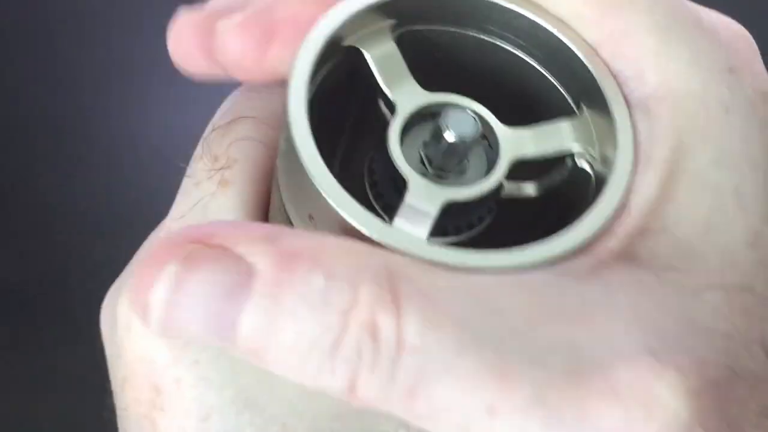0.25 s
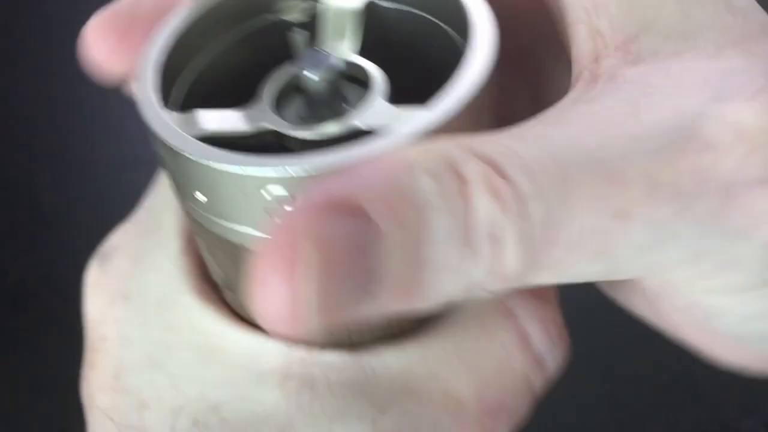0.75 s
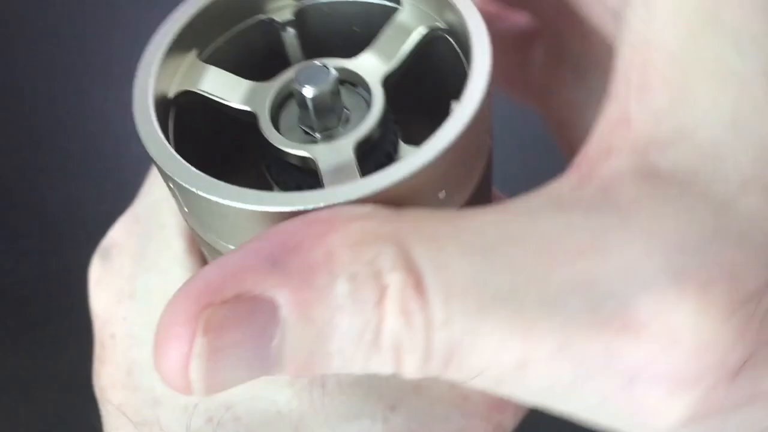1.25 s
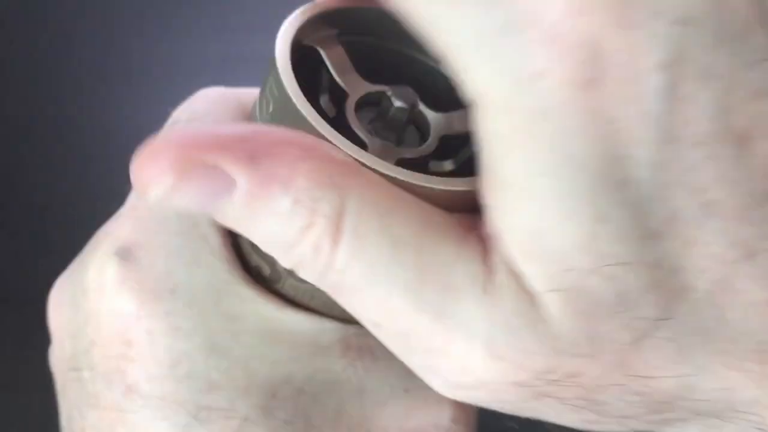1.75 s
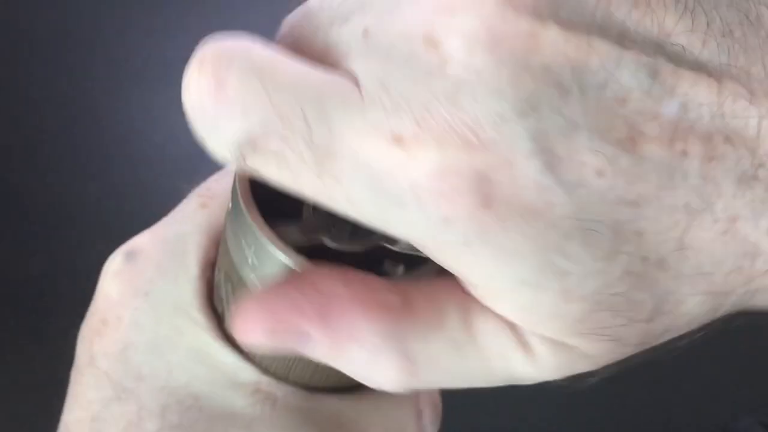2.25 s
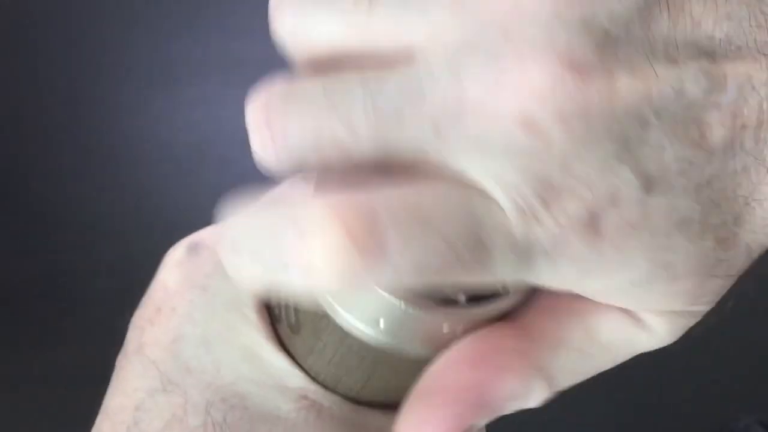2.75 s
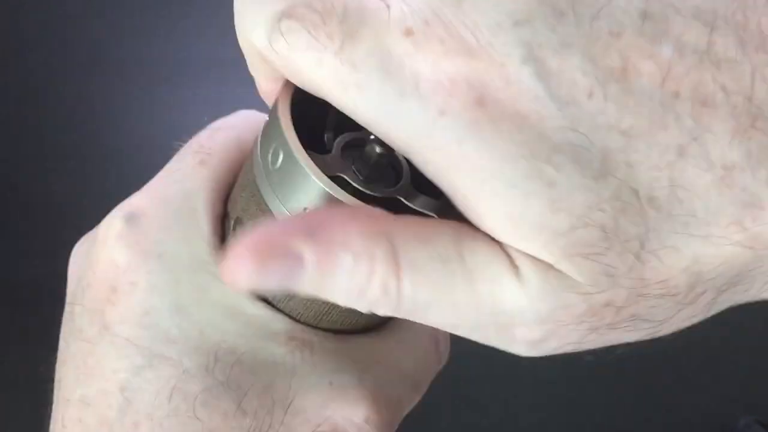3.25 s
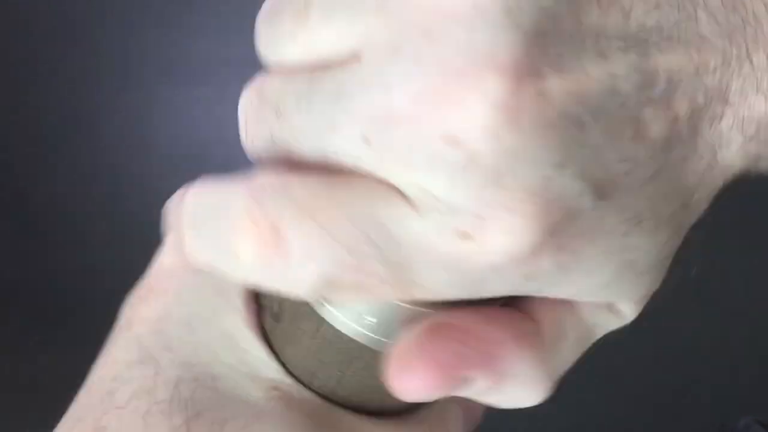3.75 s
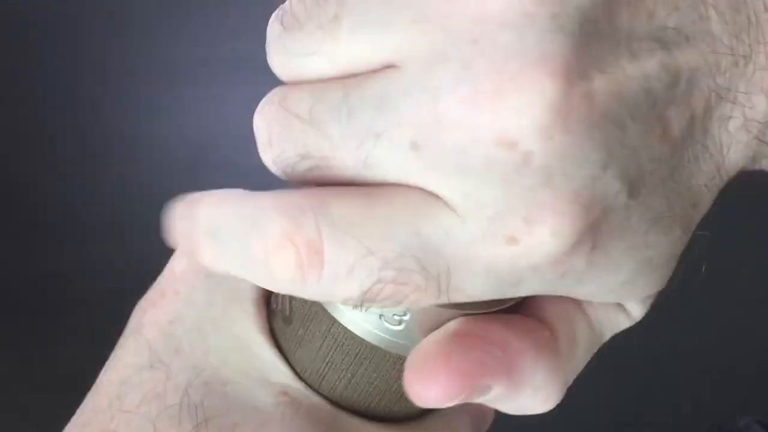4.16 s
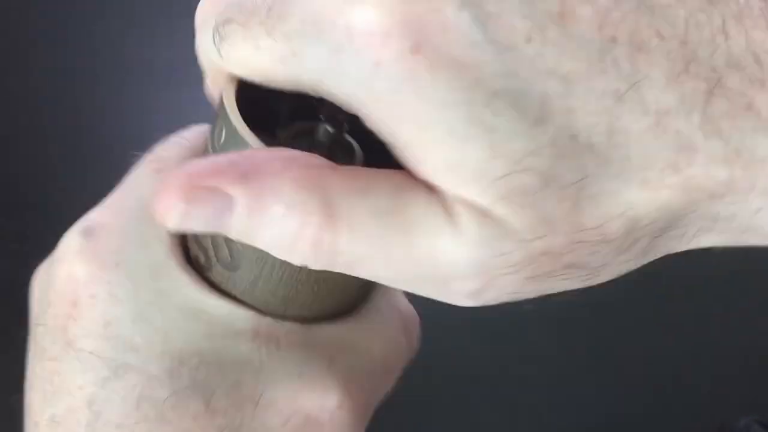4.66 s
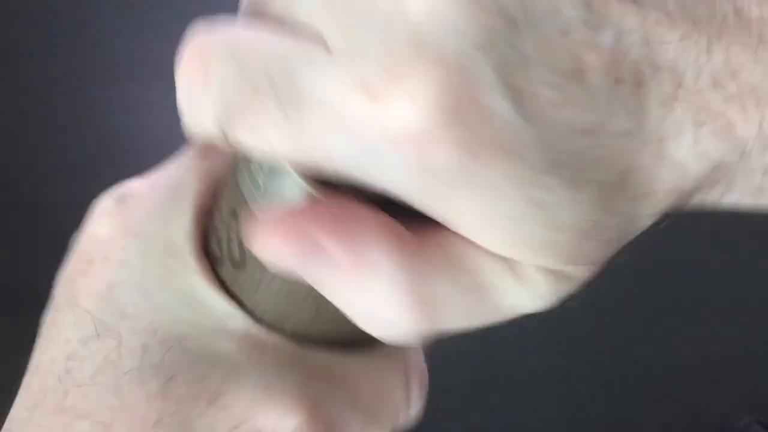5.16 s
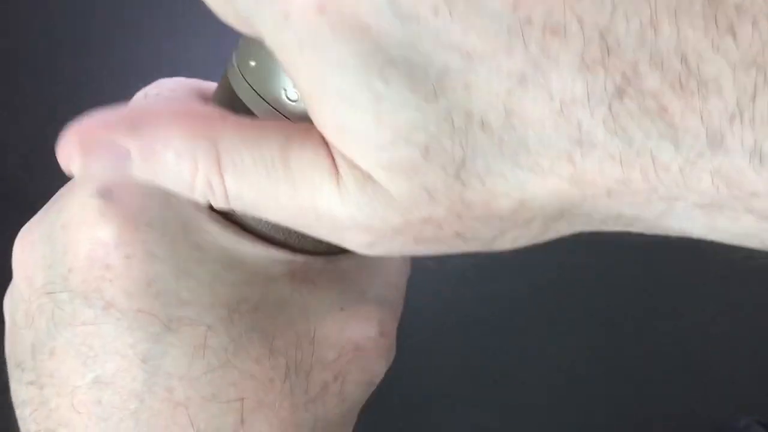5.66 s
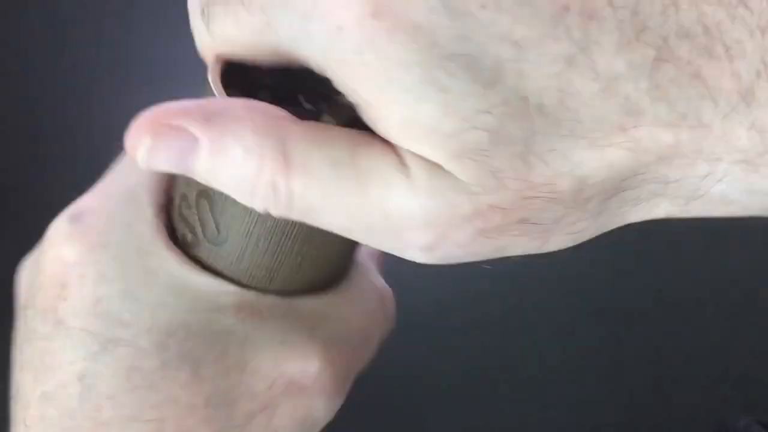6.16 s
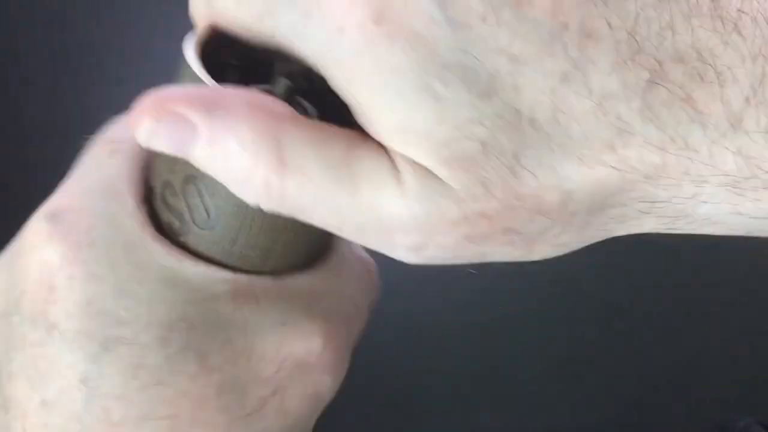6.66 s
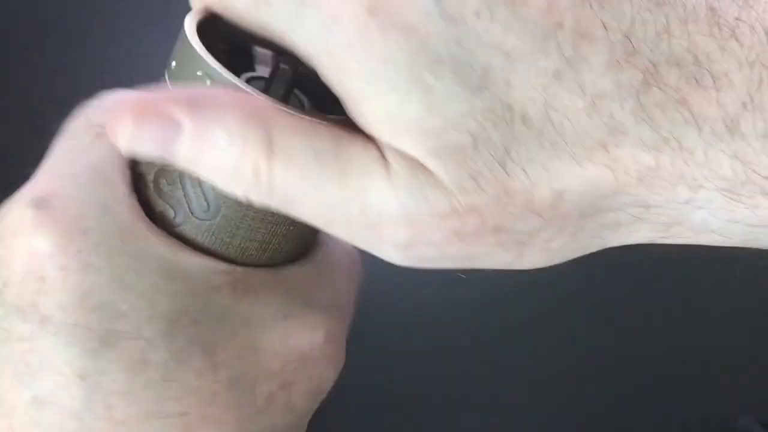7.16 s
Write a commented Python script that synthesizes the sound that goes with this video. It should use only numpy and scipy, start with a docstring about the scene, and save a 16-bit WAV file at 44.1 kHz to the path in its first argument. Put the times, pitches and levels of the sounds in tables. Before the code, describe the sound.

A few separate clicks start a fast metallic ratcheting, then sixteen short zips follow roughly three a second. The clicks are dry, hard and steely, with a small hollow cup resonance and light body thump; the first few twists are loudest and more open, later ones duller as the hand covers the cup. Light finger taps fall between. Close microphone, small room with a short diffuse tail, quiet low rumble and slight hiss.

```python
"""In a small room with a low rumble, the dial of a metal hand coffee grinder is turned close by in sixteen quick twists.
In each twist a sprung pin drops into one detent after another. Every drop is an impulse: shaped noise bursts crack,
the steel rings as decaying modes, and damped sines give the body's thump and the note of the air in the cup.
That note rises through each twist and is mostly lower in the later ones. Fingers rub and tap between twists;
the room answers with a diffuse tail over rumble and faint hiss."""
import sys
import numpy as np
from scipy import signal
from scipy.fft import rfft, irfft, next_fast_len
from scipy.io import wavfile
from scipy.ndimage import uniform_filter1d, map_coordinates

SR = 44100
rng = np.random.default_rng(int(sys.argv[2]) if len(sys.argv) > 2 else 0)


def bounce(signal):
    """Save signal as a 16-bit WAV file at the path given by the first command-line argument."""
    frames = np.transpose(np.atleast_2d(signal))
    limited = np.clip(frames, -1, 1)
    pcm = np.round(limited * 32767).astype(np.int16)
    wavfile.write(sys.argv[1], SR, pcm)


N = 326264  # length [samples]

# Level of the rumble over time, before DEEP_DB and LOW_DB: (time [s], deep level [dB], low level [dB])
RUMBLE_LEVELS = [(0.0, -68, -69.5), (0.59, -60, -64.5), (1.01, -66.5, -69), (1.42, -66.5, -68),
                 (4.95, -56, -58.5), (6.26, -72, -69), (7.4, -69.5, -64.5)]
# Spectrum of the deep rumble: (frequency [Hz], gain [dB])
DEEP_SPECTRUM = [(20, -42), (35, -17.5), (48, -4), (58, 5), (80, -6.5), (102, 0.5), (135, -13),
                 (200, -46.5)]
# Spectrum of the low rumble: (frequency [Hz], gain [dB])
LOW_SPECTRUM = [(70, -24), (125, 3), (200, -2), (260, -11.5), (340, -3.5), (430, -19.5), (700, -52)]
# Spectrum of the hiss: (frequency [Hz], gain [dB])
HISS_SPECTRUM = [(200, -14.5), (450, -7.5), (1000, -10.5), (2000, -12), (4000, -17), (9000, -24),
                 (16000, -31.5)]
# Reverberation time of the room: (frequency [Hz], T60 [s])
ROOM_DECAY = [(200, .35), (800, 0.62), (2000, 0.64), (6000, 0.59), (10000, 0.53), (15000, 0.38)]
# Skin sliding on the dial: (middle [s], half length [s], level [dB])
RUBS = [(0.284, .018, -64), (0.344, 0.017, -68)]
# Fingers letting go of the dial or taking hold:
# (time [s], level [dB], cup note [Hz], balance of the tick [dB])
TAPS = [(0.788, -50, 963, -14), (1.248, -54, 1053, -11), (3.58, -38.5, 1070, -12), (4.677, -27, 1031, 4),
        (5.403, -35, 971, 3.5)]
# Colour of the struck or rubbed metal: (frequency [Hz], gain [dB])
METAL_COLOUR = [(300, -15), (550, -20), (900, -10.5), (1400, -5), (2000, -1), (4100, 0), (4800, -5.5),
                (5400, 2), (6700, 7.5), (7600, 3), (8700, 7), (10400, 0), (12200, 7.5), (15700, 1)]
# Clusters of long-ringing modes in the steel: (centre [Hz], width [Hz], gain [dB])
STEEL_MODES = [(2140, 160, 10), (5320, 240, 7), (6600, 640, -15)]
# Broad resonances of the metal that the grip damps or frees:
# (centre [Hz], width [Hz], change over a twist [dB], gain in a firm grip [dB], gain in a loose grip [dB])
GRIP_RESONANCES = [(3150, 2100, -5, -1.73, -0.43), (5290, 600, -1.5, -6.5, 9), (6810, 650, -1.5, -4.5, 5.5),
                   (9190, 1000, -6, -1, -1), (12000, 760, 0, 0.5, -1.7)]
# One row per twist of the wrist, before scatter: (first drop [s], last drop [s], drops [count],
#   lag [+ starts slowly, - ends slowly], rush [+ fastest in the middle],
#   level at start, middle, end [dB], treble above 10 kHz at start, middle, end [dB],
#   mids [dB], looseness of grip [0-1], cup note at mid-twist [Hz], cup level [dB])
TWISTS = [(0.6165, 0.6943, 9, 0.27, 0.023, -33.5, -28, -33, 9, -14.5, -4, 1, 0.38, 1103, -14),
          (1.0919, 1.1902, 14, 0.035, -0.15, -26, -27, -32, -3, -4, -14, -3.5, 0.8, 1230, -16),
          (1.4846, 1.5637, 10, -.3, .57, -28, -23, -27, -2, -1.5, -3.5, -2, 0.93, 1218, -15.5),
          (1.9631, 2.0952, 23, 0.22, 0.46, -32, -35.5, -33, -1.5, -1.5, -5.5, -3, 0.67, 996, -17),
          (2.3474, 2.4437, 14, 0.28, 0.32, -33.5, -33, -31, 5, 7.5, -1.5, -4.5, 0.47, 1017, -19),
          (2.708, 2.8037, 12, -0.15, .41, -35, -37, -32, 0.5, 0, 4, -1.5, 0.24, 999.6, -23),
          (3.0686, 3.161, 13, -0.12, .08, -33.5, -34, -36, -2.5, 8, 4, -1, 0.66, 970, -15),
          (3.4228, 3.526, 15, -0.19, -0.11, -31, -36, -35, -3, 0.5, -3, 0.5, 0.43, 970, -15.5),
          (3.7867, 3.8889, 15, 0.015, 0.094, -38, -30.5, -33, -7.5, 4.5, 3, -6, 0, 838, -16),
          (4.151, 4.2427, 13, -.23, 0.3, -36, -32.5, -29.5, 6.5, -12.5, 3.5, -2.5, 0, 930, -21),
          (4.5094, 4.6138, 17, -.13, .27, -31.5, -33.5, -36, 0.5, 2.5, 6.5, -1, 0.35, 943, -21.5),
          (4.8682, 4.9543, 14, -.31, 0.35, -30.5, -27, -37.5, -1, -1, -3.5, -1, 0.2, 1006, -28),
          (5.2392, 5.3395, 16, 0.45, .31, -37.5, -36, -39, -7, -6, -3, -1.5, 0.36, 851, -14.5),
          (5.9621, 6.1183, 20, 0.11, -0.063, -33.5, -35, -32, -10.5, -13, -4.5, -5, 0.12, 853, -16),
          (6.4644, 6.614, 22, -0.19, 0.11, -34, -32, -27.5, 0.5, 2, 0.5, -0.5, 0.56, 923, -22),
          (6.956, 7.0882, 24, -0.27, 0.3, -37, -29.5, -38.5, 0, 3.5, 1.5, -1.5, 0.14, 965, -19.5)]
# Drops that stand out, the slow ones as the dial starts or stops and the hardest within a twist:
# (time [s], level [dB], treble above 10 kHz [dB])
LONE_DROPS = [(0.5133, -29, -8), (0.5198, -31, 2.5), (0.53, -27.5, 5.5), (0.5448, -29.5, -2.5),
              (0.5671, -34, 8), (0.596, -33.5, 14), (0.7154, -25.5, -9.5), (1.114, -25.5, 8),
              (1.2025, -26.5, -4), (1.5141, -21.5, 2.5), (1.5212, -21, 0), (1.537, -24, -3),
              (1.578, -31, 12.5), (1.5948, -30, 2.5), (2.455, -36.5, 2.5), (2.7723, -31, 6),
              (2.7899, -30.5, 6), (3.0765, -30, -2), (3.1815, -34, 7.5), (3.4339, -27, 3.5),
              (4.2318, -31, 3.5), (4.2636, -28.5, -11.5), (4.9739, -37, -2), (5.2262, -36, -6),
              (5.2927, -28.5, -4.5), (5.3426, -33.5, 3.5), (6.0051, -33.5, 2.5), (6.098, -30.5, -6),
              (6.4652, -30, -3), (6.6141, -32.5, 7)]
# How far the turning hand has closed over the cup: (time [s], closure [0-1])
HAND_CLOSURE = [(.7, 0.1), (1.9, 0.43), (3.5, 0.75)]

DEEP_DB, LOW_DB = 4.5, -1  # added to the rumble levels
BAND_LIMIT_HZ = 15950
SLACK_S = 0.0056  # the scrape leads the first drop by this
TWIST_S = 0.11  # the time in which the wrist winds round
SCATTER_S, SCATTER_DB, SCATTER_TREBLE_DB = 0.0003, 2.2, 3  # standard deviations from drop to drop
SAME_DROP_S = 0.003
# the fingers shift, so each broad resonance swells and fades
WANDER_DB, WANDER_KNOTS_PER_S = 1.85, 45
MIDS_HZ, MIDS_WIDTH_HZ = 3190, 1200
THUMP_DB, LINGER_DB = (-13, -22.5), (-4, 2)  # with the cup open and covered
THUMP_HZ, THUMP_LOG_SPREAD, THUMP_T60_S = 161, 0.9, 0.054
# the cup swells late in mid-twist; its note rises by CUP_RISE (log ratio) over the twist
CUP_SWELL_DB, CUP_SWELL_WIDTH, CUP_RISE = 4.5, 0.45, 0.069
CUP_SCATTER_DB, CUP_LOG_DETUNE, CUP_T60_S = 2.5, 0.029, 0.037


def amp(db):
    """Decibel law: level to amplitude ratio."""
    return 10 ** (np.asarray(db) / 20)


def unit(x):
    """Normalisation to an rms of 1."""
    return x / np.sqrt(np.mean(x ** 2) + 1e-20)


def along(points, hz):
    """Logarithmic frequency scale: interpolate (frequency, value) points along it."""
    f, v = np.transpose(points)
    return np.interp(np.log(hz + 1), np.log(f), v)


def bump(x, centre, width):
    """Gaussian resonance or envelope: a bell of height 1."""
    return np.exp(-((x - centre) / width) ** 2)


def wobble(rate):
    """Slow random modulation: a smooth curve through rate random knots a second."""
    knots = rng.standard_normal(int(N * rate / SR) + 4)
    return map_coordinates(knots, [np.arange(N) * rate / SR])


def filtered(x, response):
    """Linear filtering: multiply the spectrum by a response of frequency."""
    m = next_fast_len(N + SR // 2)
    return irfft(rfft(x, m) * response(np.fft.rfftfreq(m, 1 / SR)), m)[:N]


def coloured(x, gain_db, size=1024):
    """Minimum phase: a causal filter derived from its gain alone by folding the cepstrum."""
    cepstrum = irfft(np.log(amp(gain_db(np.fft.rfftfreq(size, 1 / SR)))))
    cepstrum[1:size // 2] *= 2
    cepstrum[size // 2 + 1:] = 0
    impulse = irfft(np.exp(rfft(cepstrum)))
    return signal.fftconvolve(x, impulse)[:len(x)]


def noise(spectrum):
    """Spectral shaping of white noise, at rms 1."""
    return unit(filtered(rng.standard_normal(N), lambda hz: amp(along(spectrum, hz))))


def patchy(x, depth_db):
    """Time-frequency modulation: narrow strands swell and fade, at rms 1."""
    z = signal.stft(x, nperseg=8192)[2]
    field = uniform_filter1d(rng.standard_normal(z.shape), size=4, axis=0)
    field = uniform_filter1d(field, size=4, axis=1)
    return unit(signal.istft(z * amp(depth_db * unit(field)), nperseg=8192)[1][:N])


def fade(t, t60):
    """Exponential damping: a fall of 60 dB in t60 seconds."""
    return np.exp(-np.log(1000) * t / t60)


def mode(t, hz, t60):
    """Free vibration of one struck resonance: a damped sine."""
    return np.sin(2 * np.pi * hz * t) * fade(t, t60)


def add(track, s, sound):
    """Superposition: mix a sound into the track at s seconds."""
    part = track[max(round(s * SR), 0):][:len(sound)]
    part += sound[:len(part)]


def crack(t, grain, rise, t60):
    """High modal density: modes too close to resolve are a noise burst with a rise and a decay."""
    shape = (1 - np.exp(-t / rise)) * fade(t, t60)
    early_rms = np.sqrt(np.mean(shape[:150] ** 2))  # over the first 3.4 ms
    return grain * shape / early_rms


def background():
    """Stationary noise with slow modulation: a wavering low hum and rumble, and a faint even hiss."""
    s, deep_db, low_db = np.transpose(RUMBLE_LEVELS)
    t = np.arange(N) / SR
    deep_gain = amp(DEEP_DB + np.interp(t, s, deep_db) + 1.2 * wobble(7))
    deep = deep_gain * patchy(noise(DEEP_SPECTRUM), depth_db=2.5)
    low_gain = amp(LOW_DB + np.interp(t, s, low_db) + 2.2 * wobble(5))
    low = low_gain * patchy(noise(LOW_SPECTRUM), depth_db=4)
    return deep + low + amp(-73.5) * noise(HISS_SPECTRUM)


def room(x):
    """Diffuse reverberation: a noise tail in which each frequency decays at its own rate."""
    hz, t, z = signal.stft(rng.standard_normal(SR), SR, nperseg=256)
    decay = fade(t, along(ROOM_DECAY, hz)[:, None])
    tail = signal.istft(z * decay, SR, nperseg=256)[1]
    tail *= 1 - np.exp(-np.arange(len(tail)) / SR / 0.0024)  # the tail builds up over a few ms
    return signal.fftconvolve(x, tail / np.linalg.norm(tail))[:N]


def fingers():
    """Friction and light impact: skin slides on the dial; the cup pops softly and ticks as the grip changes."""
    now, t = np.arange(N) / SR, np.arange(SR // 8) / SR
    rub_gain = sum(amp(db) * bump(now, s, length) for s, length, db in RUBS)
    out = rub_gain * noise(METAL_COLOUR)
    for s, db, cup_hz, tick_db in TAPS:
        burst = crack(t, rng.standard_normal(len(t)), rise=0.00053, t60=0.025)
        tick = amp(tick_db - 16.5) * coloured(burst, lambda hz: along(METAL_COLOUR, hz))
        pop = amp(-11.5) * mode(t, cup_hz, 0.038)
        add(out, s, amp(db) * (tick + pop))
    return out


def slack():
    """Friction before release: each twist starts with a faint scrape as the pin climbs out of its seat."""
    out, t = np.zeros(N), np.arange(SR // 16) / SR
    for start, *_ in TWISTS:
        add(out, start - SLACK_S, crack(t, rng.standard_normal(len(t)), rise=0.0012, t60=0.035))
    return amp(-55.5) * coloured(out, lambda hz: along(METAL_COLOUR, hz))


def steel(cracks):
    """Modal ringing: cracks excite the burr and shaft, freest while fingertips hold the rim."""
    t = np.arange(SR) / SR
    clusters = lambda hz: sum(amp(db) * bump(hz, centre, width) for centre, width, db in STEEL_MODES)
    ring = filtered(rng.standard_normal(N), clusters)[:SR] * fade(t, 0.53)
    free_db = np.interp(np.arange(N) / SR, [0.7, 1.1, 1.7, 1.9], [-28.5, -22.0, -36.0, -27.0])
    return signal.fftconvolve(amp(free_db) * cracks, ring / np.linalg.norm(ring))[:N]


def run_of_drops(first, last, count, lag, rush, levels_db, trebles_db):
    """Kinematics: even detents pass under a dial of varying speed; rows (time [s], level [dB], treble [dB])."""
    angle = np.linspace(0, 1, round(count))
    warp = angle * (1 - angle) * (lag + rush * (1 - 2 * angle))
    s = first + (last - first) * (angle + warp)
    arch = lambda values: np.interp(angle, [0, 0.5, 1], values)
    # no two teeth are alike
    scatter = rng.standard_normal((len(angle), 3)) * [SCATTER_S, SCATTER_DB, SCATTER_TREBLE_DB]
    return np.column_stack([s, arch(levels_db), arch(trebles_db)]) + scatter


def drops():
    """Impulse sequence: (time [s], level [dB], treble [dB], start of its twist [s], grip of its twist)."""
    lone_times = np.array(LONE_DROPS)[:, 0]
    for first, last, count, lag, rush, *rest in TWISTS:
        levels_db, trebles_db, grip = rest[:3], rest[3:6], rest[6:]
        for s, db, treble_db in run_of_drops(first, last, count, lag, rush, levels_db, trebles_db):
            # a drop that stands out takes the place of the ordinary one
            if np.abs(lone_times - s).min() > SAME_DROP_S:
                yield s, db, treble_db, first, grip
    for s, db, treble_db in LONE_DROPS:
        twist = min(TWISTS, key=lambda row: abs(row[0] - s))
        yield s, db, treble_db, twist[0], twist[-4:]


def click(t, pattern, treble_db, mids_db, resonances_db, progress, linger_db):
    """Impact and rebound: the pin snaps into a detent; the metal rings on briefly with less treble."""
    # clicks of one twist share part of their ringing
    alike = 0.55
    grain = np.sqrt(alike) * pattern + np.sqrt(1 - alike) * rng.standard_normal(len(t))
    snap = amp(-1) * crack(t, grain, rise=0.000099, t60=0.01)
    rebound = crack(t, rng.standard_normal(len(t)), rise=0.00038, t60=0.0048)
    add(snap, rng.uniform(0.0011, 0.004), amp(-13.0) * rebound)
    # the first contact is one sharp push, strongest in the mids
    push_colour = [(1000, 8.8), (3000, 19.0), (7000, 14.0), (14000, 9)]
    snap += coloured((t == 0) * 1.0, lambda hz: along(push_colour, hz))
    after = crack(t, grain, rise=0.0023, t60=0.067)
    after = coloured(after, lambda hz: along([(5000, -11.5), (13000, -17.0)], hz))

    grip = lambda hz: sum(db * bump(hz, centre, width)
                          for (centre, width, *_), db in zip(GRIP_RESONANCES, resonances_db))
    treble = lambda hz: treble_db / (1 + np.exp((10300 - hz) / 500))
    mids = lambda hz: mids_db * bump(hz, MIDS_HZ, MIDS_WIDTH_HZ)
    # a narrow resonance of the shell sinks from about 4 kHz to 2 kHz over a twist
    shell = lambda hz: 3.3 * bump(hz, 4100 - 2100 * progress, 500) - bump(hz, 2600, 1200)
    # every tooth favours or misses one resonance of its own
    tooth_db, tooth_hz = 6.5 * rng.uniform(-1, 1), rng.uniform(900, 5500)
    tooth = lambda hz: tooth_db * bump(hz, tooth_hz, 650)
    colour = lambda hz: along(METAL_COLOUR, hz) + grip(hz) + shell(hz) + treble(hz) + mids(hz) + tooth(hz)
    return coloured(snap + amp(linger_db) * after, colour)


def cup_note(t, progress, cup_hz, cup_db):
    """Cavity resonance: the air in the cup sounds a damped note that rises through the twist."""
    hz = cup_hz * np.exp(CUP_RISE * (progress - 0.5) + CUP_LOG_DETUNE * rng.standard_normal())
    swell_db = CUP_SWELL_DB * bump(progress, 0.66, CUP_SWELL_WIDTH)
    db = cup_db + swell_db + CUP_SCATTER_DB * rng.standard_normal()
    return amp(db) * mode(t, hz, CUP_T60_S)


def body_thump(t, thump_db):
    """Low-frequency impact response: the hand-held body gives a damped thump of varying pitch."""
    hz = THUMP_HZ * np.exp(THUMP_LOG_SPREAD * rng.uniform(-1, 1))
    return amp(thump_db) * mode(t, hz, THUMP_T60_S)


def detents():
    """Impact excitation: each drop of the pin cracks the metal, sounds the cup and thumps the body."""
    metal, body, t = np.zeros(N), np.zeros(N), np.arange(SR // 16) / SR
    patterns = {row[0]: rng.standard_normal(len(t)) for row in TWISTS}
    wander_db = WANDER_DB * np.array([wobble(WANDER_KNOTS_PER_S) for _ in GRIP_RESONANCES])
    _, _, change_db, firm_db, loose_db = np.transpose(GRIP_RESONANCES)
    for s, db, treble_db, start, (mids_db, loose, cup_hz, cup_db) in list(drops()):
        progress = np.clip((s - start) / TWIST_S, 0, 1)
        # the grip damps the broad resonances, and their balance shifts as the wrist winds round
        grip_db = firm_db + (loose_db - firm_db) * loose
        resonances_db = grip_db + change_db * (progress - 0.5) + wander_db[:, round(s * SR)]
        # the closing hand keeps the sound lingering inside the cup and muffles the thump
        closure = np.interp(s, *np.transpose(HAND_CLOSURE))
        linger_db = np.interp(closure, [0, 1], LINGER_DB)
        thump_db = np.interp(closure, [0, 1], THUMP_DB)
        strike = click(t, patterns[start], treble_db, mids_db, resonances_db, progress, linger_db)
        add(metal, s, amp(db) * strike)
        add(body, s, amp(db) * (cup_note(t, progress, cup_hz, cup_db) + body_thump(t, thump_db)))
    return metal, body


def scene():
    """Superposition: the grinder, its reverberation in the room and the background."""
    metal, body = detents()
    grinder = metal + body + steel(metal) + slack() + fingers()
    return (grinder + amp(-18.0) * room(grinder) + background())[None]


def record(dry):
    """Band limitation: a very steep low-pass."""
    return filtered(dry[0], lambda hz: 1 / (1 + (hz / BAND_LIMIT_HZ) ** 120))[None]


dry = scene()
out = record(dry)
bounce(out)
```